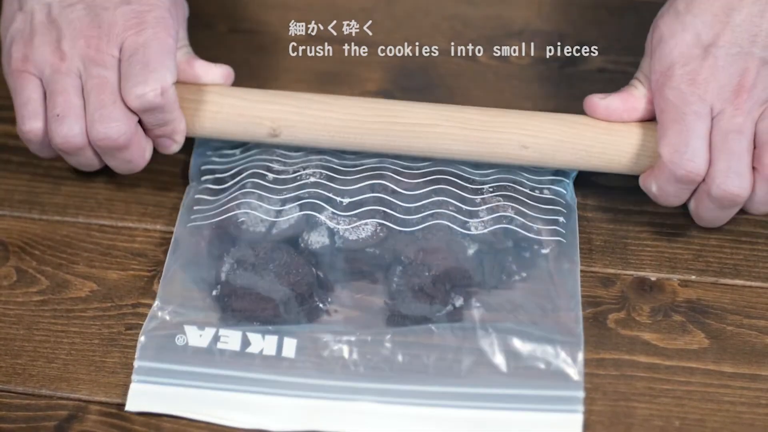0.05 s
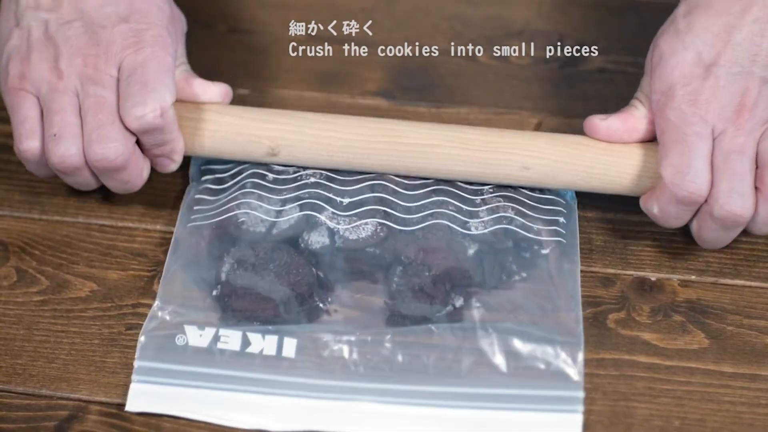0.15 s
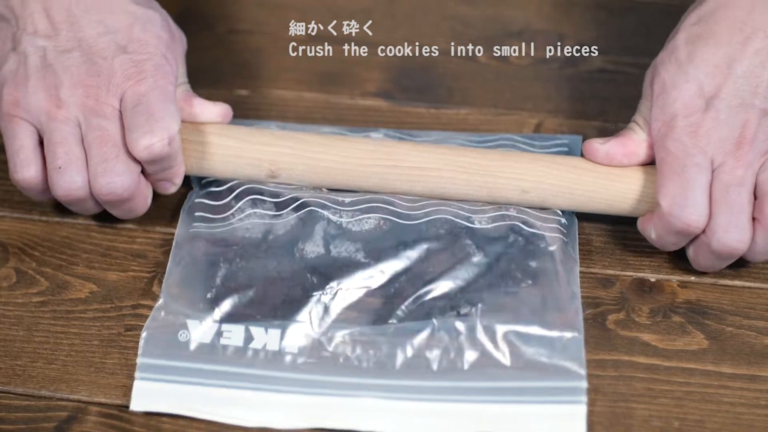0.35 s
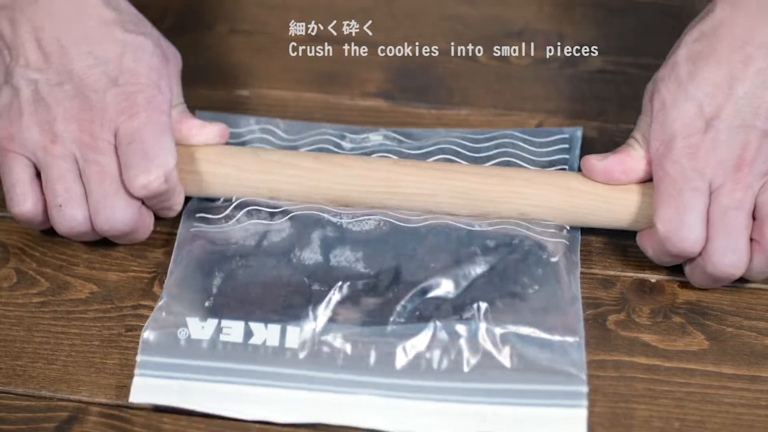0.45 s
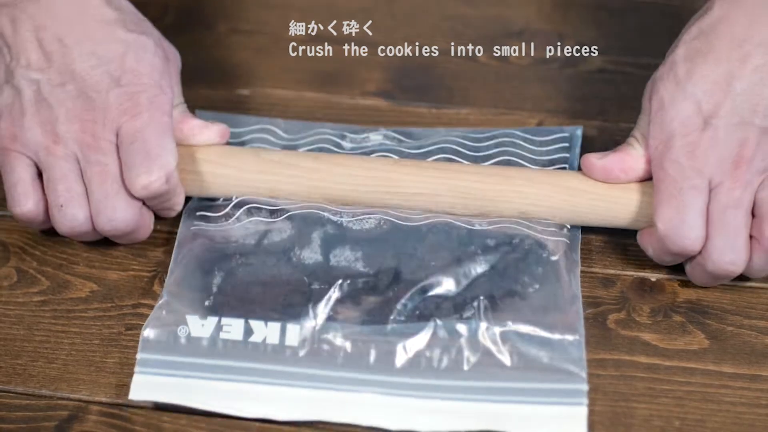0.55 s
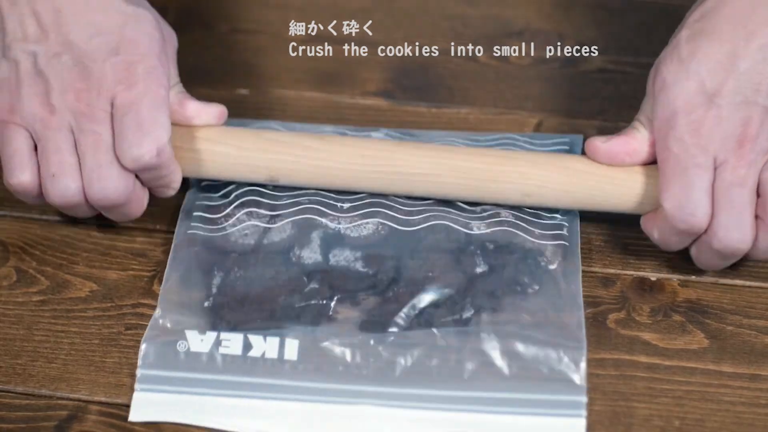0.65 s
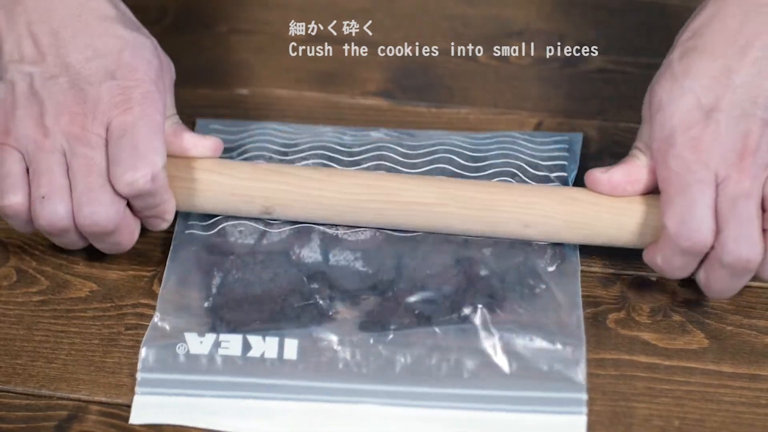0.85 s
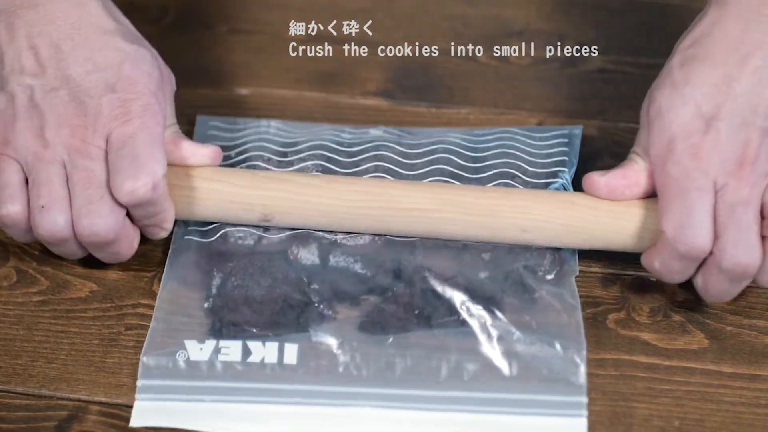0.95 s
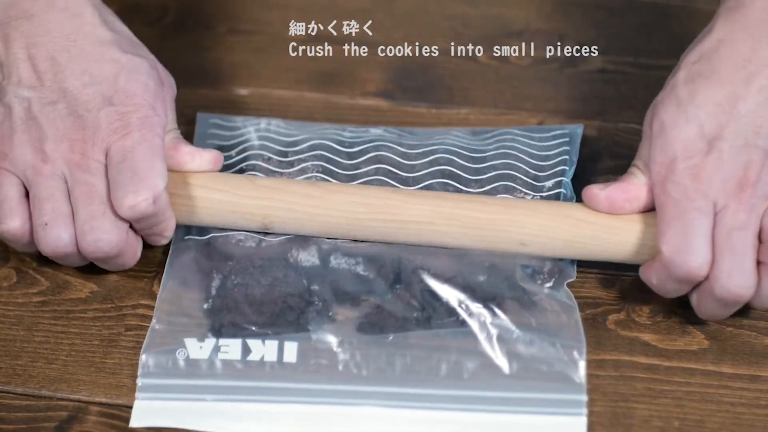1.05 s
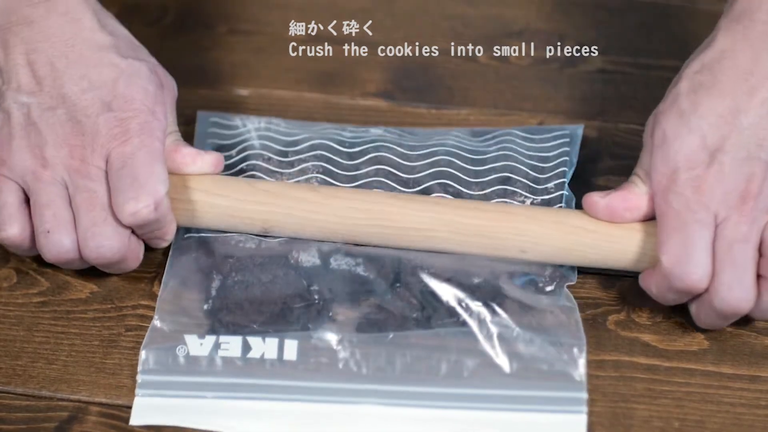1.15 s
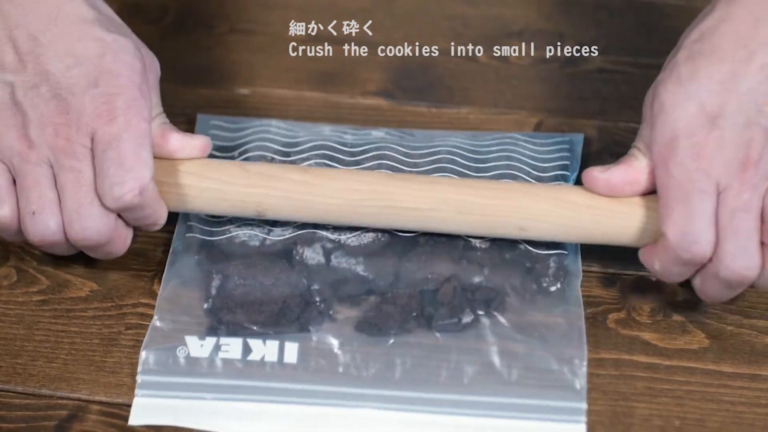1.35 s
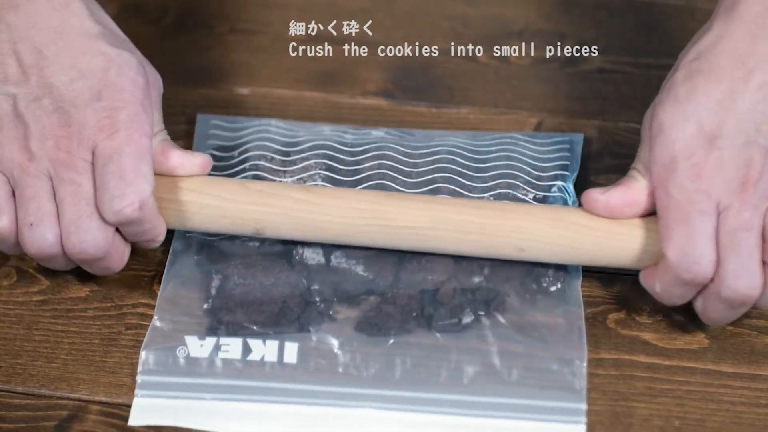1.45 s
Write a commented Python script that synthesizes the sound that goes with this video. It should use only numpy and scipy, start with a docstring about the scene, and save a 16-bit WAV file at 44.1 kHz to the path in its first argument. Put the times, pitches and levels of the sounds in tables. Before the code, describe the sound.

Close up in a quiet kitchen, bagged cookies are crushed under a rolling pin on a wooden table. A loud crunch with sharp snaps and plastic rustle comes first, then a brief pause, then a slightly softer grinding crunch.

```python
"""Rolling pin over bagged cookies

Close to a wooden table in a small kitchen, heard almost in mono. A wooden pin is pushed twice over
cookies in a plastic bag. They give way in dense crumbling with a few hard snaps, which set pin and
table ringing; the film rustles under the pin and ticks as it relaxes."""
import sys
import numpy as np
from scipy import signal
from scipy.fft import rfft, irfft
from scipy.io import wavfile
from scipy.ndimage import uniform_filter1d

SR = 44100
rng = np.random.default_rng(int(sys.argv[2]) if len(sys.argv) > 2 else 0)


def inscribe(sig):
    """Save sig as 16-bit PCM at rate SR to the path in sys.argv[1].

    A 1-D sig is mono; a 2-D sig holds one channel per row.
    Samples are clipped to [-1, 1] before scaling.
    """
    pcm = np.round(np.clip(np.atleast_2d(sig).T, -1, 1) * 32767)
    wavfile.write(sys.argv[1], SR, pcm.astype(np.int16))


N = 63945
TIME = np.arange(N) / SR

# modes of pin and table: f/Hz, width/Hz, level in the first push/dB, level in the second/dB
WOOD_MODES = [(388, 22, 6.5, -2), (523, 41, 7, -2.5), (718, 20, -4, -9), (791, 37, 0, 8.5),
              (825, 62, 8.5, 9.5), (1204, 94, -2, -1.5), (1280, 61, -14, -13), (1526, 90, -3.5, -6),
              (1698, 91, -3.5, -11), (2120, 140, -3, -14), (2180, 35, -22, -30), (2670, 135, -4, -9.5)]


def from_db(db):
    """Decibels to gain."""
    return 10 ** (np.asarray(db) / 20)


def unit_power(x):
    """Scale to unit power."""
    return x / np.sqrt(np.mean(x ** 2) + 1e-20)


def level(rows):
    """Gain along a curve of t/s, level/dB; silent outside it."""
    t, db = np.transpose(rows)
    return from_db(np.interp(TIME, np.sort(t), db, left=-120, right=-120))


def decay(t60_s):
    """Envelope that falls by 60 dB in t60_s."""
    return np.exp(-np.log(1000) * TIME / t60_s)


def butter(x, hz, kind, order=2):
    """Causal low-, high- or band-pass."""
    return signal.sosfilt(signal.butter(order, hz, kind, fs=SR, output="sos"), x + 1e-18)


def colour(x, outline):
    """Minimum-phase filter of unit energy that follows an outline of f/Hz, level/dB."""
    size = 2 ** 13
    hz, db = np.transpose(outline)
    grid_hz = np.maximum(np.arange(size // 2 + 1) * SR / size, 1)
    gain = from_db(np.interp(np.log(grid_hz), np.log(hz), db))
    cepstrum = irfft(np.log(gain))
    cepstrum[1:size // 2] *= 2
    cepstrum[size // 2 + 1:] = 0
    response = irfft(np.exp(rfft(cepstrum)))
    return signal.fftconvolve(x, response / np.linalg.norm(response))[:N]


def resonance(x, hz, width_hz):
    """Two-pole resonance with gain 1 at its peak."""
    radius = np.exp(-np.pi * width_hz / SR)
    feedforward = np.array([1, 0, -1]) * (1 - radius ** 2) / 2
    feedback = [1, -2 * radius * np.cos(2 * np.pi * hz / SR), radius ** 2]
    return signal.lfilter(feedforward, feedback, x + 1e-18)


def grains(per_s, spread_db, clump_db):
    """Tiny clicks of uneven size that come in clumps; power evened to 1 over some 20 ms."""
    sizes = from_db(spread_db * np.minimum(rng.exponential(1, N), 5)) * rng.choice([-1, 1], N)
    clumps = from_db(clump_db * unit_power(butter(rng.standard_normal(N), 178, "low")))
    clicks = sizes * clumps * (rng.random(N) < per_s / SR)
    power = uniform_filter1d(uniform_filter1d(clicks ** 2, size=700), size=700)
    return clicks / np.sqrt(np.maximum(power, 1e-6))


def room_tone():
    """Steady low noise of the kitchen."""
    # spectrum of the room noise: f/Hz, level/dB
    air_colour = [(20, -7), (50, -6.5), (150, -10), (185, -1.5), (240, 1), (400, 1.5), (1100, 1.5),
                  (2000, -11.5), (4000, -19), (8000, -24), (16000, -28.5)]
    return from_db(-54) * colour(rng.standard_normal(N), air_colour)


def film_rustle():
    """The plastic film crinkles under the pin in dense, bright clicks."""
    # course of the rustle: t/s, level/dB
    rustle = [(0.0, -44), (0.096, -75), (0.184, -72), (0.214, -37), (0.23, -35), (0.262, -38.5),
              (0.318, -36), (0.338, -25), (0.382, -30), (0.436, -31), (0.452, -23), (0.496, -24),
              (0.622, -62.5), (0.678, -49.5), (0.686, -45), (0.766, -67), (0.868, -76), (0.896, -39.5),
              (0.908, -35.5), (0.992, -49), (1.016, -34), (1.11, -33.5), (1.13, -28.5), (1.154, -38.5),
              (1.182, -32), (1.288, -52.5), (1.352, -46), (1.388, -68), (1.45, -62.5)]
    # spectrum of the film: f/Hz, level/dB
    film_colour = [(200, -8), (900, -6), (2200, 6.5), (3500, 0.5), (5200, -1.5), (7300, 0), (9500, -3),
                   (11600, 2), (12700, -7.5), (14000, -11), (16000, -2.5)]
    t, db = np.transpose(rustle)
    envelope = from_db(np.interp(TIME, t, db) - 2)
    crinkles = grains(per_s=7000, spread_db=2.5, clump_db=2.13)
    return colour(envelope * crinkles, film_colour)


def film_ticks():
    """Single creases flip with a sharp edge and ring for a few cycles."""
    # crease flips: t/s, level/dB, f/Hz
    flips = [(0.001, -28.5, 1900), (0.6863, -30, 4400), (0.6881, -34, 1720), (0.7194, -33, 2260),
             (0.7265, -36, 1570), (0.7295, -34, 1740), (0.7633, -37.5, 2500), (0.78, -41, 2960),
             (1.3268, -34, 3450), (1.3294, -33, 2900), (1.354, -28, 2720)]
    out = np.zeros(N)
    for t, db, hz in flips:
        start = int(t * SR)
        edge = from_db(-3) * butter(rng.standard_normal(N), [hz / 2, 2 * hz], "band", order=1)
        tick = (np.sin(2 * np.pi * hz * TIME) + edge) * decay(t60_s=0.0044)
        out[start:] += from_db(db) * tick[:N - start]
    return out


def crumbling():
    """Countless tiny fractures: two collapses in the first push, one long grind in the second."""
    # one curve for each crush: t/s, level/dB
    crushes = [
        [(0.195, -51), (0.212, -42.5), (0.226, -29), (0.258, -37.5), (0.306, -36.5), (0.325, -33), (0.345, -25),
         (0.385, -32), (0.41, -25), (0.445, -34.5)],
        [(0.432, -39), (0.451, -22), (0.497, -22), (0.525, -32), (0.575, -65)],
        [(0.88, -57.5), (0.912, -33.5), (0.95, -31.5), (0.978, -35), (1.018, -23.5), (1.045, -30.5),
         (1.065, -25.5), (1.1, -33.5), (1.128, -29.5), (1.155, -32.5), (1.19, -32.5), (1.214, -45.5),
         (1.25, -42.5), (1.28, -70)],
    ]
    # band of each crush: lowest f/Hz, highest f/Hz
    bands = [(90, 4100), (537, 4600), (130, 8500)]
    out = np.zeros(N)
    for crush, band_hz in zip(crushes, bands):
        fractures = level(crush) * grains(per_s=7000, spread_db=2.5, clump_db=2)
        out += butter(fractures, band_hz, "band", order=1)
    return from_db(-2.5) * out


def snaps():
    """Each snap is one sharp pulse with a short spill of crumbs, dulled by the cookie above it."""
    # hard breaks: t/s, level/dB, low-pass f/Hz
    breaks = [(0.2245, -25, 3950), (0.3375, -2.5, 7000), (0.3465, -14.5, 700), (0.3535, -6, 810),
              (0.3714, -2, 2850), (0.3754, -7.5, 3000), (0.3785, -7, 2500), (0.405, -11, 7050),
              (0.4496, -15, 4500), (0.4657, -5, 3020), (0.4955, -17.5, 3520), (1.0195, -37, 1310),
              (1.057, -5.5, 1310), (1.0592, -9.5, 2000), (1.129, -17, 6000)]
    spill_db, spill_s = -17.5, 0.0035
    out = np.zeros(N)
    for t, db, hz in breaks:
        start = int(t * SR)
        pulse = from_db(spill_db) * rng.standard_normal(N) * np.exp(-TIME / spill_s)
        pulse[0] = -1  # the break itself
        out[start:] += from_db(db) * butter(pulse, hz, "low", order=1)[:N - start]
    return out


def cookies():
    """Crumbling and snaps, direct and through the wood, whose modes change level with the pin's place."""
    # spectrum of breaking cookie: f/Hz, level/dB
    crumb_colour = [(40, -47), (150, -4.5), (350, -4.5), (800, -5), (1200, -2.5), (1800, -1.5), (2700, -5),
                    (3500, -6.5), (5500, -10), (10000, -11), (16000, -17)]
    second_push_s = 0.8
    force = colour(crumbling() + snaps(), crumb_colour)
    wood = np.zeros(N)
    for hz, width_hz, first_db, second_db in WOOD_MODES:
        coupling = from_db(np.where(TIME < second_push_s, first_db, second_db))
        wood += resonance(force * coupling, hz, width_hz)
    return from_db(-0.5) * force + from_db(0.5) * wood


def table_thuds():
    """The pin drops as a cookie gives way and sets the low modes of the table top thudding."""
    # drops of the pin: t/s, level/dB
    jolts = [(0.227, -43), (0.264, -37), (0.3395, -29), (0.37, -55), (0.406, -37), (0.457, -28),
             (0.496, -74), (0.911, -38.5), (0.99, -31), (1.021, -36), (1.052, -62), (1.149, -42)]
    # modes of the table top: f/Hz, level/dB, T60/s
    table_modes = [(96.3, -2, 0.24), (116, -4.5, 0.26), (186.9, 0, 0.23)]
    spread_db = 3
    out = np.zeros(N)
    for t, db in jolts:
        start = int(t * SR)
        for hz, mode_db, t60_s in table_modes:
            ring = np.sin(2 * np.pi * hz * TIME) * decay(t60_s)
            gain = from_db(db + mode_db + spread_db * rng.standard_normal())
            out[start:] += gain * ring[:N - start]
    return from_db(-6) * butter(out, [70, 403], "band")


def roll_back():
    """The bare pin rolls back between the pushes; its light contact hums in the lower wood modes."""
    # course of the roll: t/s, level/dB
    roll = [(0.54, -60), (0.6, -56.5), (0.72, -70), (0.8, -68)]
    contact = butter(rng.standard_normal(N), 870, "low")
    hum = sum(resonance(contact * from_db(db), hz, width_hz) for hz, width_hz, db, _ in WOOD_MODES)
    return level(roll) * unit_power(hum)


def diffuse_tail(x):
    """A short, dense decay that keeps changing; the treble dies sooner."""
    step_s, delay_s, treble_hz = 0.1, 0.002, 1850
    out = np.zeros(N)
    for centre in np.arange(0, TIME[-1] + step_s, step_s):
        # each overlapping stretch gets a tail of its own
        window = np.cos(np.pi / 2 * np.minimum(np.abs(TIME - centre) / step_s, 1))
        noise = rng.standard_normal(N) * (TIME > delay_s)
        low = butter(noise, treble_hz, "low", order=1)
        treble = noise - low
        tail = (low * decay(t60_s=0.26) + treble * decay(t60_s=0.18))[:N // 4]
        out += signal.fftconvolve(x * window, tail / np.linalg.norm(tail))[:N]
    return out


def side_hiss(mid, crush):
    """A very faint, mostly high hiss that swells with the crushing over a steady floor."""
    # spectrum of the steady hiss: f/Hz, level/dB
    hiss_colour = [(20, -12), (100, -9), (500, -13), (2000, -17), (16000, -12)]
    treble = butter(crush, 6800, "high", order=4)
    swell = diffuse_tail(from_db(-48) * mid + from_db(-33) * treble)
    return swell + from_db(-70) * colour(rng.standard_normal(N), hiss_colour)


def scene():
    """Heard almost in mono; a very faint, mostly high hiss differs between left and right."""
    crush = cookies() + film_rustle() + film_ticks()
    direct = crush + room_tone() + table_thuds() + roll_back()
    kitchen = from_db(-7) * diffuse_tail(crush)  # reflections change as pin and hands move
    mid = direct + kitchen
    side = side_hiss(mid, crush)
    return np.array([mid + side, mid - side])


def record(dry):
    """The top is cut steeply."""
    cutoff_hz = 15750
    return signal.sosfilt(signal.ellip(12, .2, 80, cutoff_hz, fs=SR, output="sos"), dry)


dry = scene()
out = record(dry)
inscribe(out)
```